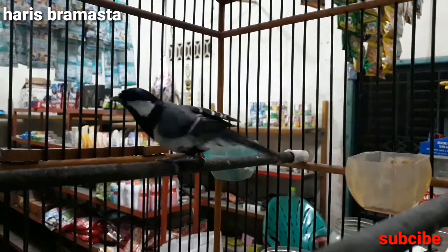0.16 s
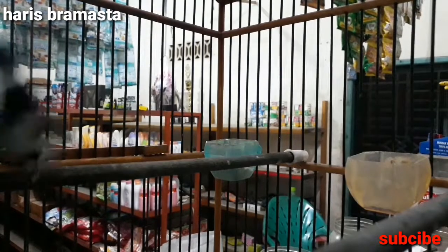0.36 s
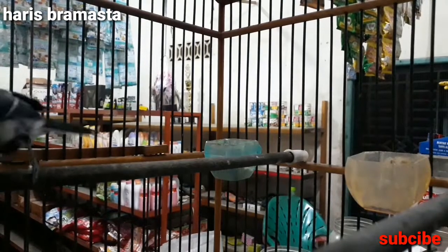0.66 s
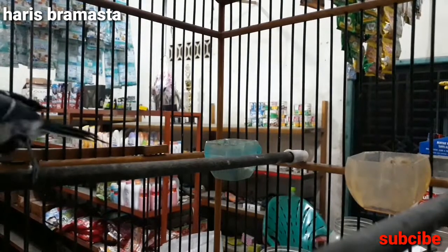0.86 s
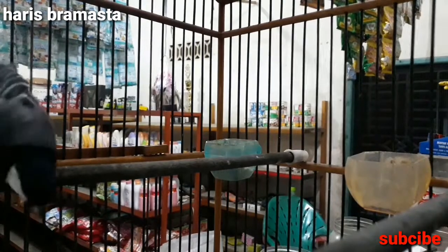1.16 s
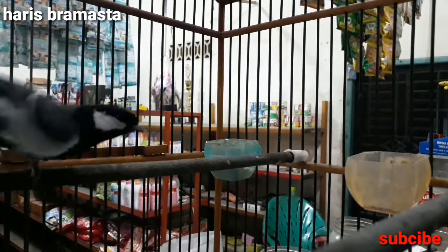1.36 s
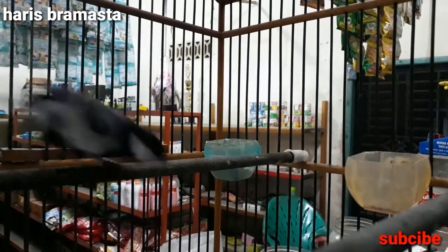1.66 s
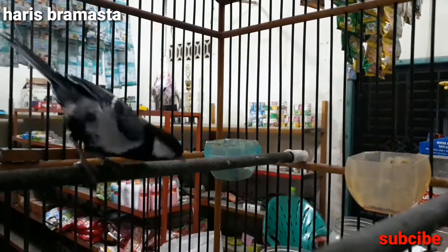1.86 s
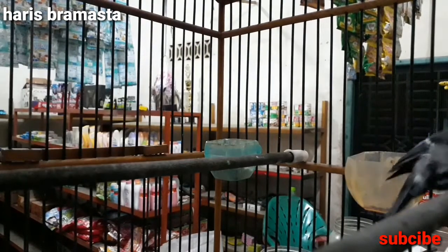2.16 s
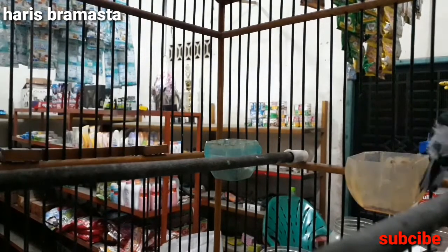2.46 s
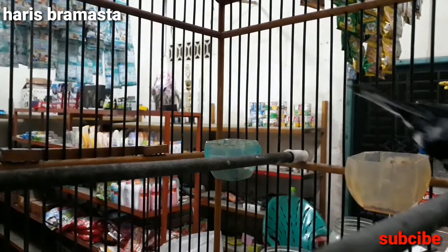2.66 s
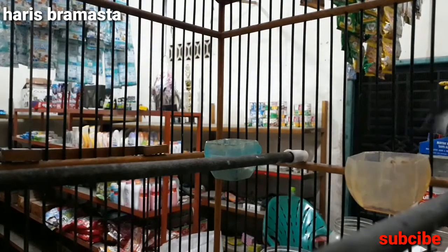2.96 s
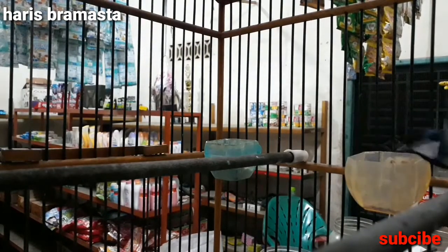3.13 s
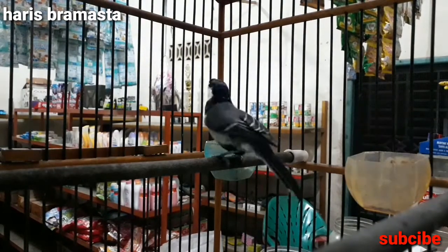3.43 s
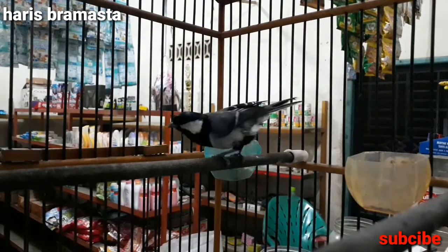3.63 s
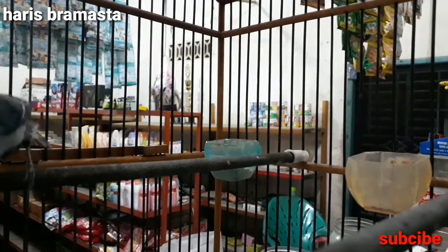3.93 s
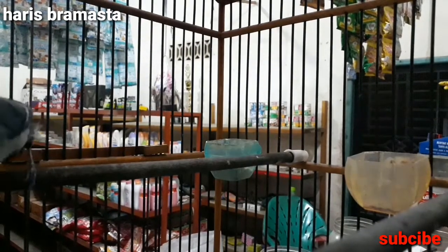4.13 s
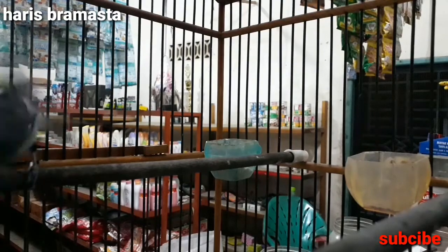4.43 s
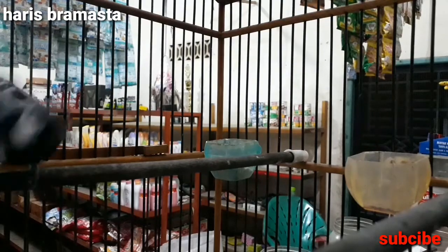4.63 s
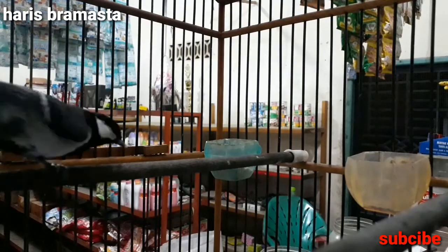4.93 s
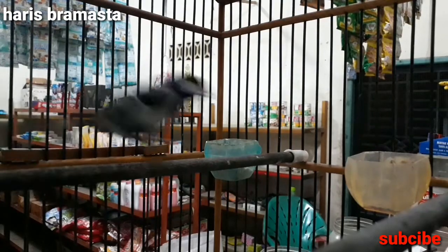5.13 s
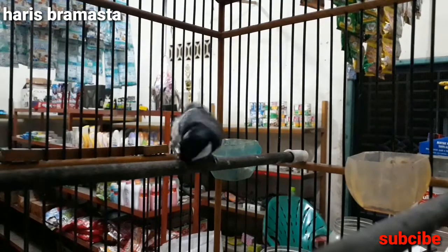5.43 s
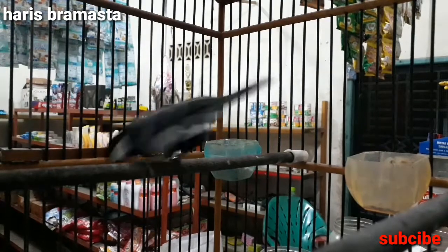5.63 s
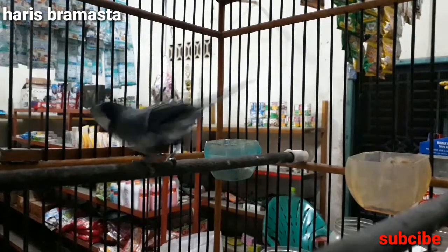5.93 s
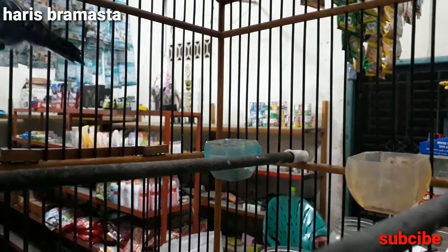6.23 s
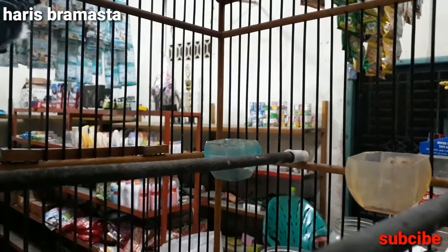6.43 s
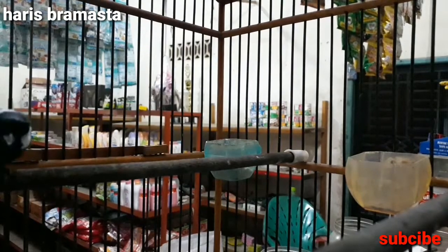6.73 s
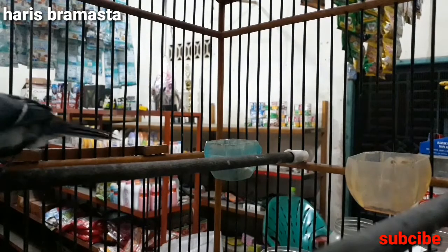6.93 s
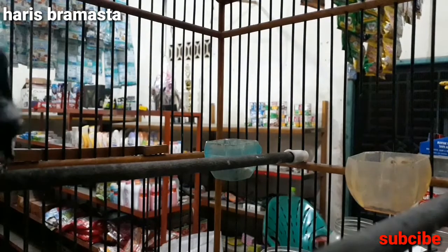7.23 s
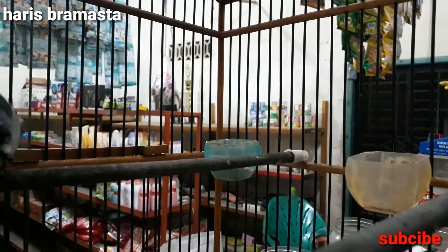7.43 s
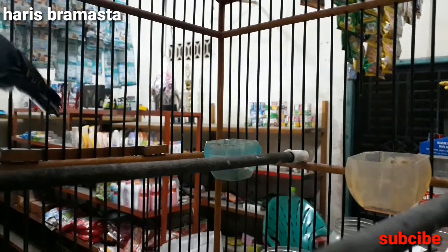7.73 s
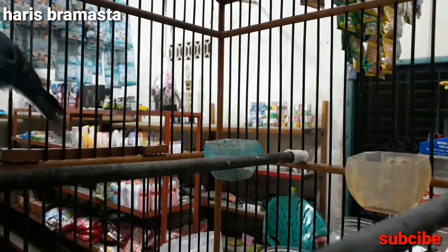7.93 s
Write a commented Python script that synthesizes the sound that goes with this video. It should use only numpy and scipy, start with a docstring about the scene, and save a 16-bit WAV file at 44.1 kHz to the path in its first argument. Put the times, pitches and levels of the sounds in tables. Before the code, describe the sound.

A small caged bird is close by in a hard-walled shop with a short echo, over a faint low street drone and a fading motor hum. During the first second, birds farther back give slurred whistles and thin, high, quavering calls. The caged bird lands with light wooden knocks at about 0.1, 0.4, 1.2 and 2.1 seconds, the last with a faint rising squeak. From 2.4 to 3.1 seconds it gives five rapid, sharp, upswept chips, the loudest sound. From about 4.2 to 6 seconds the softer gliding whistles return. Faint scratchy rising ticks come near 4.3 and 7.2 seconds, and one thin high call at 6.6. From around 5.5 seconds a vehicle approaches outside, its road noise peaking near 7.3 seconds, then easing as its low hum falls in pitch. One last close chip sounds at 8 seconds.

```python
"""In a hard-walled shop, a small caged bird lands on its perch and gives sharp chips close by.
Birds farther back add slurred whistles, thin high calls and rising ticks. Each call is a gliding
tone with harmonics, the perch rings in damped modes, and the room prolongs both as reverberation.
Outside, one motor fades away and another swells past in a wash of road noise, its hum falling."""
import sys
import numpy as np
from scipy import signal
from scipy.fft import rfft, irfft, next_fast_len
from scipy.io import wavfile
from scipy.ndimage import uniform_filter1d, map_coordinates

SR = 44100
rng = np.random.default_rng(int(sys.argv[2]) if len(sys.argv) > 2 else 0)


def unload_wav(signal):
    """Save mono or channel-first audio to the path in sys.argv[1] as 16-bit WAV at rate SR, clipped to [-1, 1]."""
    wavfile.write(
        sys.argv[1],
        SR,
        np.round(np.clip(np.atleast_2d(signal).T, -1, 1) * 32767).astype(np.int16),
    )


N = 356769
SNAP_S = 0.011  # a chip's fall from its top pitch


def amp(db):
    """Decibels as an amplitude ratio."""
    return 10 ** (np.asarray(db) / 20)


def unit(x):
    """Normalisation to rms 1."""
    return x / np.sqrt(np.mean(x ** 2) + 1e-20)


def arch(u):
    """A parabola: 0 at u = 0 and u = 1, 1 halfway."""
    return 4 * u * (1 - u)


def along(points, hz):
    """Interpolation of (frequency [Hz], value) points on a logarithmic frequency axis."""
    f, v = np.transpose(points)
    return np.interp(np.log(hz + 1), np.log(f + 1), v)


def curves(rows):
    """Linear interpolation in time: the sample times, then each further column at those times."""
    s, *cols = np.transpose(rows)
    t = np.arange(s[0], max(s[-1], s[0] + .01), 1 / SR)
    return [t] + [np.interp(t, s, c) for c in cols]


def wobble(rate, size):
    """Smooth random modulation: a spline through rate knots a second."""
    knots = rng.standard_normal(int(size * rate / SR) + 4)
    return map_coordinates(knots, [np.arange(size) * rate / SR])


def add(track, s, sound):
    """Superposition of a sound on a track at time s."""
    start = int(np.clip(round(s * SR), 0, N - 1))
    track[start:start + len(sound)] += sound[:N - start]


def filtered(x, gain):
    """Zero-phase filtering: the spectrum of x times a gain of frequency."""
    m = next_fast_len(N + 8192)
    return irfft(rfft(x, m) * gain(np.fft.rfftfreq(m, 1 / SR)), m)[:N]


def rush(spectrum, patchy_db):
    """Coloured noise of rms 1, modulated in random patches of time and frequency."""
    z = signal.stft(rng.standard_normal(N), nperseg=1024)[2]
    patches = uniform_filter1d(rng.standard_normal(z.shape), size=6, axis=0)
    patches = uniform_filter1d(patches, size=10, axis=1)
    noise = signal.istft(z * amp(patchy_db * unit(patches)), nperseg=1024)[1][:N]
    return unit(filtered(noise, lambda hz: amp(along(spectrum, hz))))


def tone(hz, db, overtones, jitter, jitter_rate, fade=0.0018):
    """A harmonic series with random frequency modulation and ends softened over fade seconds."""
    size = len(hz)
    phase = 2 * np.pi * np.cumsum(hz * (1 + jitter * wobble(jitter_rate, size))) / SR
    upper = sum(amp(level) * np.sin(round(k) * phase) * (k * hz < SR / 2) for k, level in overtones)
    edge = np.minimum(np.arange(size), np.arange(size)[::-1]) / (fade * SR)
    return np.sqrt(2) * amp(db) * (np.sin(phase) + upper) * np.sin(np.pi / 2 * np.minimum(edge, 1)) ** 2


def in_shop(x, direct_db, echo_db):
    """Reverberation: direct sound, then an exponentially decaying tail unique to each position."""
    # reverberation time of the shop: (frequency [Hz], t60 [s])
    decay = [(300, 0.43), (2000, 0.36), (3500, 0.39), (7000, 0.32), (14000, 0.6)]
    hz, t, z = signal.stft(rng.standard_normal(SR * 3 // 4), SR, nperseg=256)
    tail = signal.istft(z * amp(-60 * t / along(decay, hz)[:, None]), SR, nperseg=256)[1]
    response = np.pad(amp(echo_db) * tail / np.linalg.norm(tail), (round(.004 * SR), 0))
    response[0] = amp(direct_db)
    return signal.fftconvolve(x, response)


def road_noise():
    """Spreading loss: roar and tyre hiss follow one vehicle's distance as another's die away."""
    # spectra of roar, tyre hiss and engine noise thrown ahead: (frequency [Hz], relative density [dB])
    roar_spectrum = [(25, -16), (50, -7.5), (110, -1.5), (220, -2), (580, -3.5), (1000, -5.5), (1500, -9),
                     (2800, -16), (5500, -28), (9000, -44)]
    hiss_spectrum = [(3000, 4.5), (5500, 2), (7000, -0.5), (8000, -13), (9500, -7), (11000, 0.5),
                     (15500, -2.5)]
    ahead_spectrum = [(150, -17), (330, -2), (550, 4), (800, -8), (1500, -20), (3200, -20.5), (7000, -43.5)]
    nearest_s, crossing_s = 7.35, 0.62  # closest approach; time to travel that distance
    t = np.arange(N) / SR
    decades = np.log10(np.hypot(1, (t - nearest_s) / crossing_s))  # of distance, from the closest
    leaving_db = -5 * t
    roar = np.hypot(amp(-33.5 - 27 * decades), amp(-60 + leaving_db))
    hiss = np.hypot(amp(-56.5 - 22.5 * decades), amp(-66.5 + leaving_db))
    ahead = amp(-39) * np.exp(-((t - 6.95) / .45) ** 2) * rush(ahead_spectrum, patchy_db=-2.5)
    roar *= amp(0.26 * wobble(9.8, N))
    return roar * rush(roar_spectrum, patchy_db=1.5) + hiss * rush(hiss_spectrum, patchy_db=3.5) + ahead


def street_drone():
    """Low-frequency noise forms a continuous floor under the traffic."""
    # drone spectrum: (frequency [Hz], relative density [dB])
    spectrum = [(25, -29.5), (80, -4.5), (115, 0.5), (185, -4.5), (260, -14.5), (400, -6.5), (900, -45)]
    return amp(-57.5) * rush(spectrum, patchy_db=2.5)


def passing_motor():
    """An exhaust sounds harmonics of its sinking firing rate, each wavering on its own."""
    # envelope of the fundamental: (time [s], level [dB])
    envelope = [(0.0, -63), (2.03, -74.5), (2.95, -61.5), (5.04, -61), (5.86, -48), (6.8, -43), (7.61, -37),
                (7.98, -49.5), (8.09, -51)]
    # exhaust orders: (multiple, relative level [dB])
    exhaust = [(2, -3.5), (3, -7), (4, -6), (5, -14), (6, -10.5), (9, -10.5)]
    firing_hz, drop_hz, slowing_s, width_s = 54.1, 8.3, 7.2, 1.2
    out = np.zeros(N)
    t, db = curves(envelope)
    hz = firing_hz - drop_hz * (t - slowing_s) / np.hypot(width_s, t - slowing_s)
    orders = [(k, order_db + 3 * wobble(5.9, len(t))) for k, order_db in exhaust]
    motor = tone(hz, db + wobble(10, len(t)), orders, jitter=0.012, jitter_rate=25)
    add(out, t[0], in_shop(motor, direct_db=-2, echo_db=-11.5))
    return out


def leaving_motor():
    """Hum and gear whine of a departing motor: brief partials under slow amplitude modulation."""
    # partials: (onset [s], starting frequency [Hz], sag [Hz/s], level [dB], duration [s])
    partials = [(0, 163, 0, -60.5, .7), (.18, 361, 4, -58, .5), (.5, 137, 1, -60.5, 1.3),
                (.85, 342, 45, -66, .8)]
    out = np.zeros(N)
    for s, start_hz, sag, db, length in partials:
        t = np.arange(0, length, 1 / SR)
        level = db + 3 * wobble(6.16, len(t))
        add(out, s, tone(start_hz - sag * t, level, [], jitter=0.0111, jitter_rate=16.8, fade=0.061))
    return out


def engine_whine():
    """Masking: faint engine tones arrive ahead of the vehicle, until its roar covers them."""
    # partials at the crest of their swell: (frequency [Hz], level [dB])
    partials = [(339, -66), (404, -66), (603, -68), (910, -69), (1244, -67.5), (1720, -67.5)]
    crest_s = 5.3
    swell_db = -1.5 * (np.arange(N) / SR - crest_s) ** 2
    return sum(tone(np.full(N, hz), db + swell_db + 3 * wobble(5, N), [], jitter=.006, jitter_rate=22)
               for hz, db in partials)


def whistlers():
    """Arcs of pitch, clear or rasping, from far enough back that reverberation exceeds direct sound."""
    # notes: (onset [s], duration [s], start [Hz], middle [Hz], end [Hz], level [dB], swell [dB],
    # rasp [fraction of pitch])
    notes = [ (0, 0.016, 1630, 1697, 1710, -42.5, -14, 0.033),
             (0, 0.059, 4020, 4087, 4090, -39.5, -22, 0.0022),
             (0.046, 0.047, 1960, 1960, 2025, -36.5, 12, 0.012),
             (0.088, 0.18, 2104, 2014, 2183, -37, 3.5, 0.0071),
             (0.185, 0.0577, 2760, 2747, 2640, -38.5, 12, 0.022),
             (0.243, 0.068, 2430, 2346, 2280, -47, -2, .02),
             (0.28, 0.058, 2890, 2690, 2934, -35, 9, 0.0089),
             (0.315, 0.038, 3150, 3230, 3350, -40, -13, 0.033),
             (0.435, 0.072, 2702, 2780, 2050, -41, -4, 0.024),
             (0.519, 0.046, 2830, 2854, 2860, -33.5, -5, 0.0064),
             (0.563, 0.068, 2965, 3010, 3020, -44, 3, 0.025),
             (0.674, 0.081, 3760, 3990, 3980, -42, 16, 0.049),
             (0.74, 0.16, 3640, 3432, 3545, -41.5, -3, 0.0094),
             (.875, 0.13, 3472, 3660, 3530, -41, 0, 0.011), (1.022, 0.054, 3290, 3220, 3560, -48, 6, 0.022),
             (4.107, 0.2, 4100, 4160, 4230, -66.5, 19, 0.0036),
             (4.21, 0.14, 2300, 2130, 2233, -51.5, 25, 0.013),
             (4.331, 0.25, 2217, 2348, 2500, -41.5, -1, 0.011),
             (4.495, 0.19, 3930, 4195, 4530, -62.5, 10, 0.013),
             (4.584, 0.219, 2448, 2582, 2536, -37, 0, 0.014),
             (4.685, 0.33, 4390, 4250, 4310, -64, -22, 0.011),
             (5.021, 0.22, 2418, 1775, 1753, -47, 13, 0.027),
             (5.066, 0.28, 4470, 4246, 4420, -57.5, 6, 0.017),
             (5.359, 0.18, 2030, 1911, 1604, -39, 12, 0.012),
             (5.385, 0.49, 4310, 4430, 4430, -70.5, 9, 0.014),
             (5.662, 0.14, 1970, 1828, 1607, -42, 7, 0.044),
             (5.808, 0.11, 1748, 1800, 1788, -39, -8, 0.021),
             (5.99, 0.042, 2180, 2330, 2470, -31.5, -7, 0.0037),
             (6.041, 0.033, 2420, 2684, 2800, -34, -12, 0.019)]
    # overtones of a note: (multiple, relative level [dB])
    harmonics = [(2, -33), (3, -48), (4, -46)]
    # buzz of the lowest notes: (pitch [Hz], second-harmonic boost [dB])
    buzz = [(1700, 25), (1900, 0)]
    out = np.zeros(N)
    for s, length, start_hz, middle_hz, end_hz, db, swell_db, rasp in notes:
        u = np.linspace(0, 1, int(length * SR))
        hz = start_hz + (end_hz - start_hz) * u + (middle_hz - (start_hz + end_hz) / 2) * arch(u)
        pressure = wobble(55, len(u))  # more air pressure makes a note higher and louder
        level = db + swell_db * (u - .5) + 2 * pressure
        dulling_db = 3 * s  # the song starts bright and grows purer
        overtones = [(k, base_db - dulling_db + along(buzz, hz) / (k - 1)) for k, base_db in harmonics]
        slur = tone(hz * (1 + 0.0095 * pressure), level, overtones,
                    jitter=rasp, jitter_rate=650, fade=.006 + .1 * length)
        add(out, s, in_shop(slur, direct_db=-2, echo_db=1))
    return out


def high_calls():
    """Frequency modulation makes thin, sinking calls quaver; one faint squeak glides upward."""
    # thin calls: (onset [s], level [dB], pitch [ratio])
    calls = [(0.515, -45.5, 1.034), (0.804, -48, 1.026), (1.138, -51.5, 1.028), (6.602, -54, 1.04)]
    # a squeak in flight: (time [s], pitch [Hz], level [dB])
    flight_call = [(2.116, 3620, -60), (2.13, 6000, -56.5), (2.146, 6800, -61.5), (2.2, 6970, -63.5)]
    length_s, start_hz, sag_hz_per_s = 0.1, 7240, 2800
    quaver_hz, quaver_period_s = 85, 0.0663
    out = np.zeros(N)
    t = np.arange(0, length_s, 1 / SR)
    shape_db = 16 * (arch(t / length_s) - 1)
    for s, db, pitch in calls:
        quaver = np.cos(2 * np.pi * t / quaver_period_s) + .5 * wobble(98, len(t))
        hz = start_hz - sag_hz_per_s * t + quaver_hz * quaver
        level = db + shape_db + 2 * wobble(120, len(t))
        call = tone(pitch * hz, level, [(2, -24.5)], jitter=0.004, jitter_rate=600)
        add(out, s, in_shop(call, direct_db=0, echo_db=-9))
    t, hz, db = curves(flight_call)
    squeak = tone(hz, db, [], jitter=0.026 * np.exp(-(t - t[0]) / 0.012), jitter_rate=1100)
    add(out, t[0], in_shop(squeak, direct_db=-12, echo_db=-4.5))
    return out


def ticks():
    """Fast upsweeps, strongest on the second harmonic, roughened by jitter and broadband noise."""
    # one upsweep: (time [s], base pitch [Hz], relative level [dB], base jitter [fraction of pitch])
    contour = [(0, 1650, -22, .15), (.016, 2130, -13, .08), (.035, 2480, -8, .04), (.043, 2690, 1.5, .012),
               (.054, 2720, -2, .01), (.066, 2660, -15, .03)]
    # ticks: (onset [s], level [dB], pitch [ratio], scratch offset [dB], jitter [ratio])
    calls = [(3.607, -67, 1.02, 4, 5), (4.256, -48.5, 1.01, -9, 1.2), (5.282, -64, 1.0, 3.5, 5.9),
             (7.158, -48.5, .975, -7.5, 4.4)]
    # overtones of a tick: (multiple, relative level [dB])
    harmonics = [(2, 14), (3, -26), (4, -20), (5, -23)]
    # scratch spectrum: (frequency [Hz], relative density [dB])
    spectrum = [(2500, -23), (3600, -0.5), (5600, 3.5), (7200, -12), (9500, -22.5), (15000, -27.5)]
    out = np.zeros(N)
    t, hz, shape_db, scatter = curves(contour)
    scratch = rush(spectrum, patchy_db=-1.5)
    swell = np.exp(-((t - .036) / 0.022) ** 2)
    for s, db, pitch, scratch_db, rasp in calls:
        jitter = np.minimum(rasp * scatter, .15)
        call = tone(pitch * hz, db + shape_db, harmonics, jitter, jitter_rate=1800)
        call += amp(db + scratch_db + 6) * swell * scratch[round(s * SR):][:len(t)]
        # a second, higher voice sounds above the start of the sweep
        upper_db = db - 450 * np.abs(t - .018)
        upper = tone(6400 + 15000 * t, upper_db, [(2, -19)], jitter=.11, jitter_rate=3000)
        add(out, s, in_shop(call + upper, direct_db=-3, echo_db=0))
    return out


def perch():
    """Impact excitation: each foot rings the wooden perch's damped modes and rattles the cage."""
    # landings: (time [s], level [dB])
    landings = [(0.104, -45), (.409, -43), (1.165, -40.5), (2.126, -34.5)]
    # modes of the perch: (frequency [Hz], relative level [dB], t60 [s])
    modes = [(503, -3.5, 0.076), (725, -4.5, 0.065), (925, 2, 0.061), (1010, -2.5, .045), (1335, -5, 0.07),
             (1455, -5.5, .06)]
    rattle_db, rattle_t60_s = -13, 0.093
    rattle_band = signal.butter(5, [450, 1550], "bandpass", fs=SR, output="sos")
    out, t = np.zeros(N), np.arange(SR // 5) / SR
    for s, db in landings:
        for lead_s, foot_db in [(.008, -10.5), (0, 0)]:  # one foot brushes the perch first
            ring = sum(amp(level + rng.normal(0, 2) - 60 * t / t60)
                       * np.sin(2 * np.pi * (hz * t + rng.random())) for hz, level, t60 in modes)
            rattle = unit(signal.sosfilt(rattle_band, rng.standard_normal(len(t))))
            rattle *= amp(rattle_db - 60 * t / rattle_t60_s)
            knock = amp(db + foot_db) * (0.36 * ring + rattle) * (1 - np.exp(-t / 0.00043))
            add(out, s - lead_s, in_shop(knock, direct_db=-1, echo_db=-13.5))
    return out


def chip_gesture():
    """A chip's modulation: time from its top [s], base pitch [Hz] and relative level [dB]."""
    sweep_s, close_s = 0.043, 0.052
    start_hz, sweep_end_hz, dip_hz, close_hz = 2045, 3650, 2569, 2983
    t = np.arange(-sweep_s, close_s, 1 / SR)
    # the pitch sweeps up, flicks over its top, snaps down and settles on a closing note
    bow = 113 * arch(np.minimum(1 + t / sweep_s, 1))
    sweep = np.interp(t, [-sweep_s, 0, SNAP_S], [start_hz, sweep_end_hz, dip_hz]) + bow
    flick = 275 * np.exp(-(t / 0.0035) ** 2)
    settle = (close_hz - dip_hz) * (1 - np.exp(-np.maximum(t - SNAP_S, 0) / .009))
    droop = 166.6 * np.exp((t - close_s) / 0.004)  # as the note is cut off
    hz = uniform_filter1d(sweep + flick + settle - droop, size=110)  # the syrinx rounds the corners
    attack_db = 27.5 * np.minimum((t + sweep_s) / 0.02 - 1, 0)
    release_db = 6 * np.minimum((close_s - t) / 0.028 - 1, 0)
    accent_db = 6.5 * np.exp(-((t + 0.0061) / .0045) ** 2)  # a push just before the top
    return t, hz, attack_db + release_db + accent_db


def near_bird():
    """The syrinx repeats one swept chip; the cage floor and walls return early reflections."""
    # chips: (time of the top [s], sweep level [dB], turn level [dB], closing level [dB],
    # pitch [ratio], reflections [dB])
    chips = [(2.455, -20, -21.5, -13, 1.008, -16.5), (2.601, -18, -18, -15, 1.005, -16.5),
             (2.747, -19.5, -20.5, -24, 1.008, -14), (2.898, -23.5, -20, -26, 0.99, -12.5),
             (3.04, -20.5, -21, -16.5, 1.01, -17), (7.98, -27.5, -22, -26.5, 1.03, -9)]
    # overtones before brightening: (multiple, relative level [dB])
    harmonics = [(2, -45), (3, -48), (4, -48.5), (5, -51)]
    out = np.zeros(N)
    t, hz, shape_db = chip_gesture()
    opening = np.exp(-(t - t[0]) / 0.01)  # each chip starts harsh and settles into a whistle
    bright_db = 57 * opening + 8 * np.clip(t / SNAP_S, 0, 1)  # the closing note brightens again
    jitter = 0.002 + 0.053 * opening
    for s, sweep_db, turn_db, close_db, pitch, echo_db in chips:
        stress_db = np.interp(t, [.002, .016, .036], [sweep_db, turn_db, close_db])
        level = shape_db + stress_db + 1.1 * wobble(180, len(t))
        overtones = [(k, db + bright_db / (k - 1) + 3.3 * wobble(150, len(t))) for k, db in harmonics]
        chip = tone(pitch * hz, level, overtones, jitter, jitter_rate=3400, fade=0.0033)
        add(out, s + t[0], in_shop(chip, direct_db=-0.5, echo_db=echo_db))
        for delay_s, gain in rng.uniform([.002, -1], [.012, 1], size=(5, 2)):
            add(out, s + t[0] + delay_s, gain * amp(echo_db) * chip)
    return out


def scene():
    """Superposition of birds, cage and street at one microphone."""
    indoors = near_bird() + whistlers() + high_calls() + ticks() + perch()
    street = road_noise() + street_drone() + passing_motor() + leaving_motor() + engine_whine()
    return (indoors + street)[None]


def record(dry):
    """Band limiting: an ideal low-pass filter removes the highest treble."""
    cutoff_hz = 15600
    return filtered(dry[0], lambda hz: hz < cutoff_hz)[None]


dry = scene()
out = record(dry)
unload_wav(out)
```